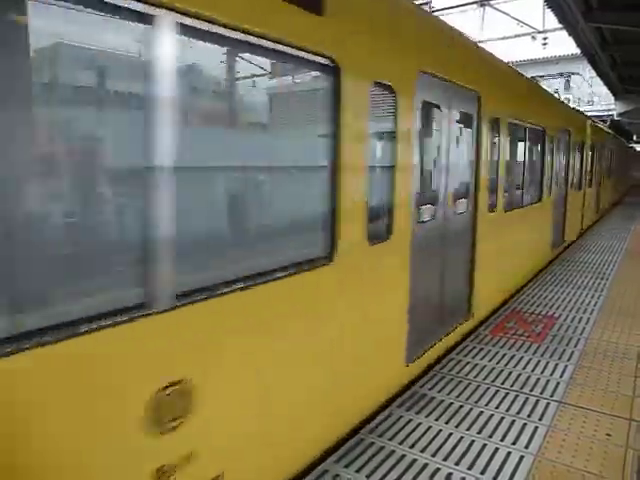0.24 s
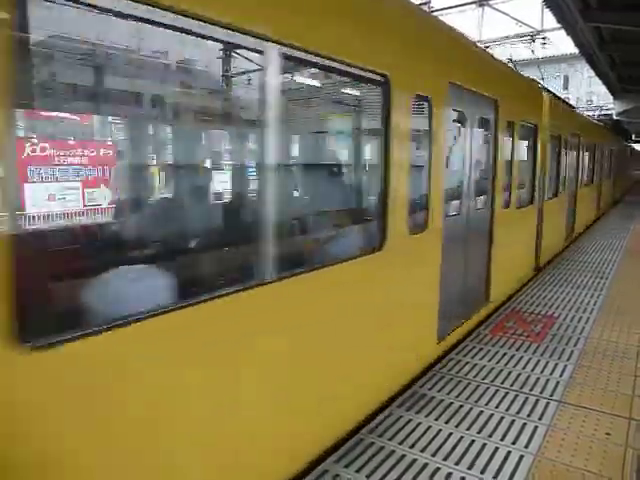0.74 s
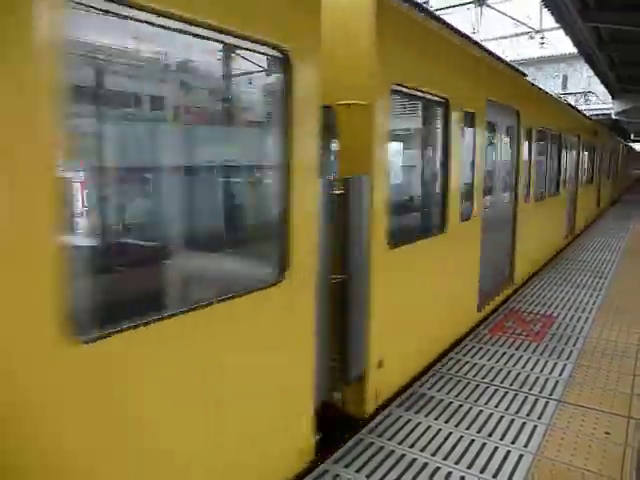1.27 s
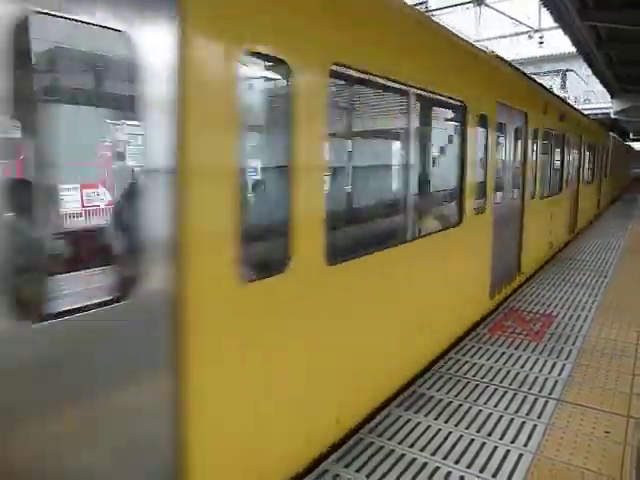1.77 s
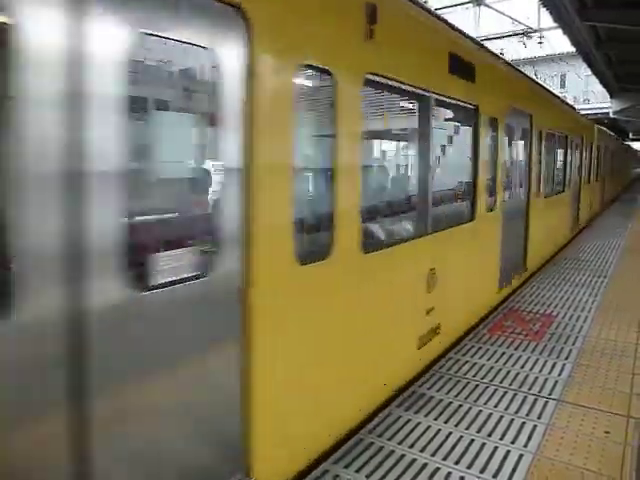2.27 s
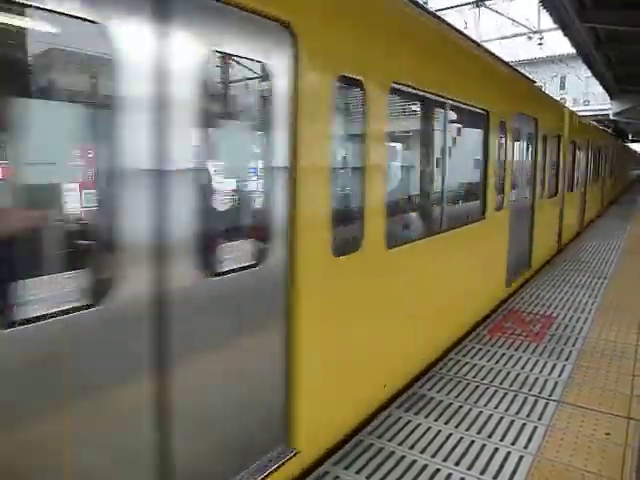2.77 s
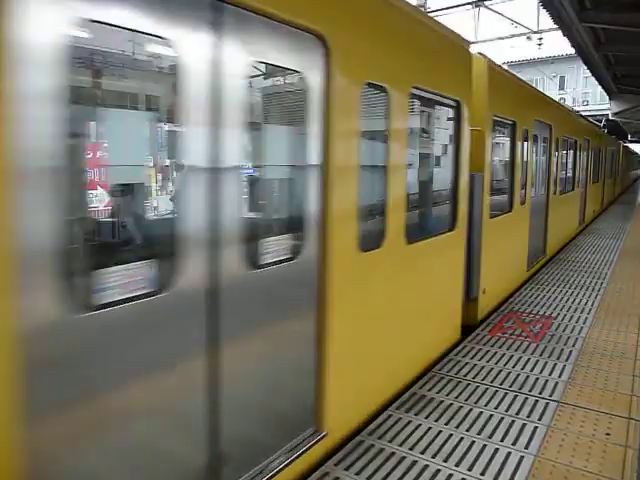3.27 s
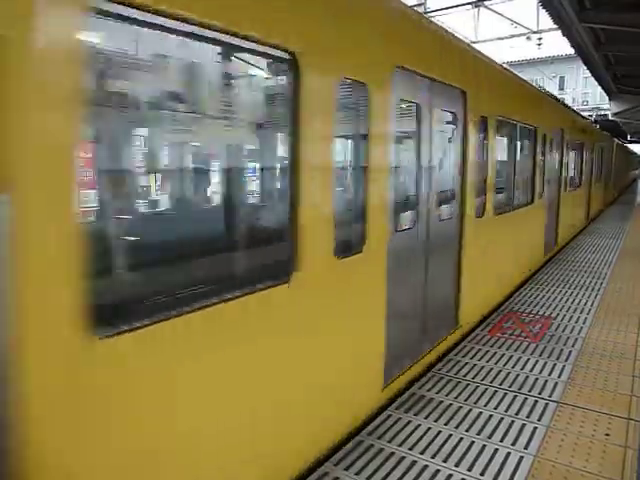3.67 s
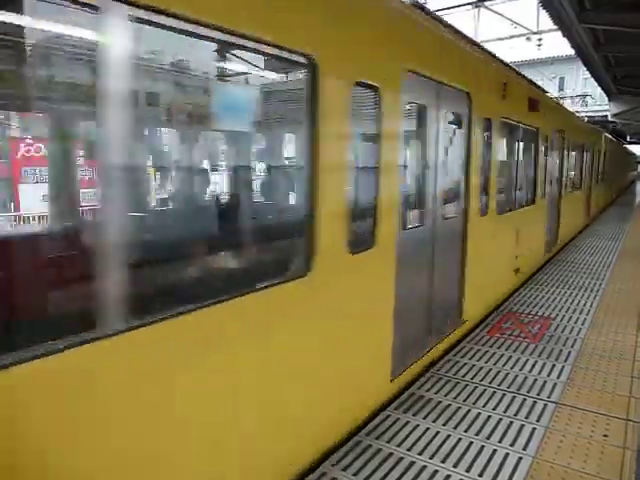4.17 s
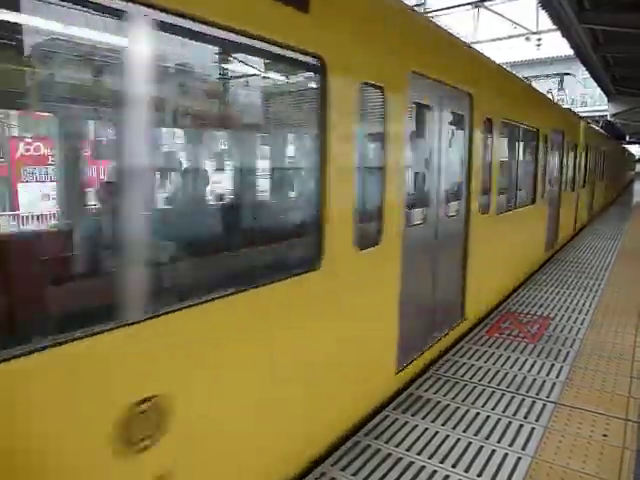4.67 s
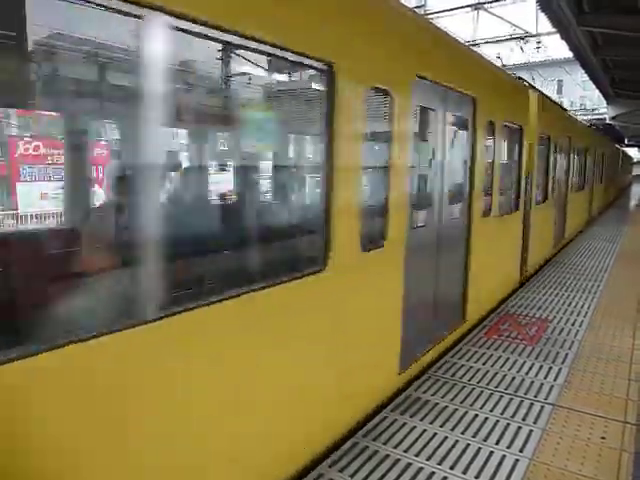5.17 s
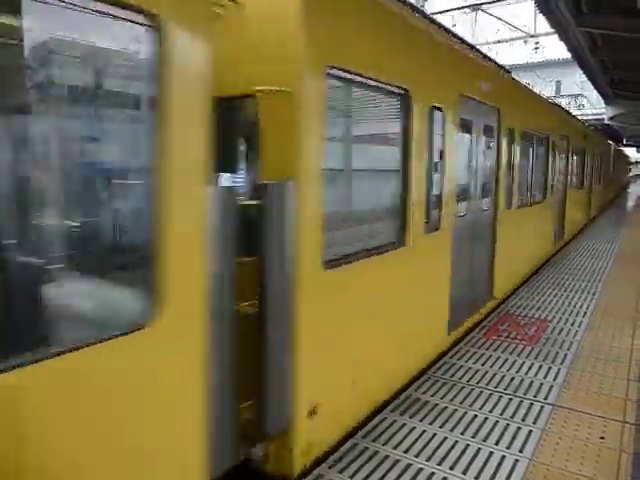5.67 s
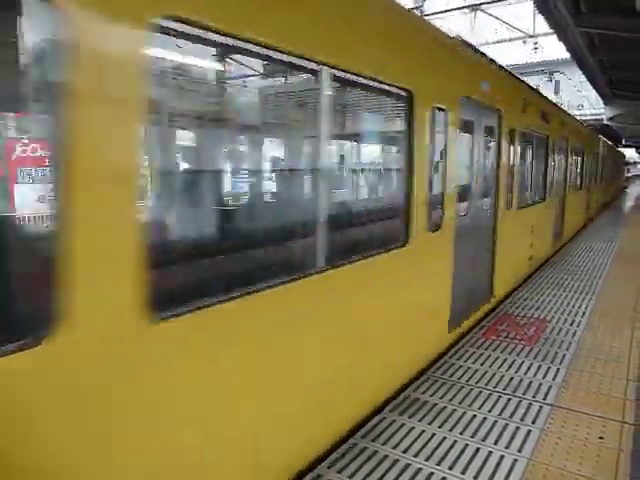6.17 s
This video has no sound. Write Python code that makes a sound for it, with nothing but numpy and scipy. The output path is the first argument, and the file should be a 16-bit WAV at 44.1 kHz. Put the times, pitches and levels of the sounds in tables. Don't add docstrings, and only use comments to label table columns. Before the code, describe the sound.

Beside a roofed station platform, an electric train is already rolling past and slowly gathering speed. A wavering motor hum and thinner whine creep upward over steady wheel roar and hiss. Axles clack in pairs, some near and bright, others duller and farther. Bogies rumble, panels boom, and a faint squeal comes late before the motors ease off. A small stereo camera hears it close, with slightly dull treble.

```python
import sys
import numpy as np
from scipy import signal
from scipy.fft import rfft, irfft, next_fast_len
from scipy.io import wavfile
from scipy.ndimage import uniform_filter1d

SR = 44100
rng = np.random.default_rng(int(sys.argv[2]) if len(sys.argv) > 2 else 0)


def master_out(mix):
    frames = np.transpose(np.atleast_2d(mix))
    ceiling = np.clip(frames, -1, 1)
    pcm = np.round(ceiling * 32767).astype(np.int16)
    wavfile.write(sys.argv[1], SR, pcm)


def invert_db(x):
    u = np.asarray(x, float) / 20
    return 10 ** u


N = 284004

# (t/s, level/dB)
ROLL = [(0, 2.5), (.7, 1.5), (1.1, -1.5), (2.0, 0), (2.7, -0.5), (3.4, 4.5), (4.3, 3.5), (5.1, 1.5),
        (5.36, 3.5), (5.6, 2.5), (6.06, 4), (6.44, 2.5)]
# (lower f/Hz, higher f/Hz)
RAIL_HZ = (2357, 3010)


def evened(x):
    return x / np.sqrt(np.mean(x ** 2) + 1e-20)


def read(points, hz):
    f, value = np.transpose(points)
    return np.interp(np.log(hz + 1), np.log(f + 1), value)


def curves(rows):
    s, *columns = np.transpose(rows)
    return [np.interp(np.arange(N) / SR, s, c) for c in columns]


def passing(rows, far_db):
    t = np.arange(0, N + 32, 32) / SR
    power = invert_db(2 * far_db)
    for s, db, half_s in rows:
        power = power + invert_db(2 * db) * np.exp(-((t - s) / half_s) ** 2)
    return np.interp(np.arange(N) / SR, t, 10 * np.log10(power))


def drift(rate_hz):
    size = next_fast_len(N // 16 + 2)
    a, b = rng.standard_normal((size // 8, 2)).T
    hz = np.arange(len(a)) * SR / (16 * size)
    spectrum = (a + 1j * b) * np.exp(-(2 * hz / rate_hz) ** 4)
    coarse = evened(irfft(spectrum, size))
    return np.interp(np.arange(N) / 16, np.arange(size), coarse)


def port_pair(left, other, hz):
    # (f/Hz, likeness 0..1)
    likeness = [(60, .85), (120, .945), (230, .996), (460, .996), (910, .96), (1810, .76), (3570, .61),
                (7060, .6), (8200, .97)]
    # (f/Hz, phase/rad)
    lead = [(60, .01), (300, .07), (900, .25), (2000, .55), (4000, .35), (7200, .1)]
    # (f/Hz, level/dB)
    tilt = [(60, .6), (1400, .6), (2500, .2), (4200, -.5), (7000, -.5)]
    same = np.clip(read(likeness, hz), 0, 1)
    right = same * left + np.sqrt(1 - same ** 2) * other
    right = right * np.exp(-1j * read(lead, hz))
    half_tilt_db = read(tilt, hz) / 2
    return np.array([left * invert_db(half_tilt_db), right * invert_db(-half_tilt_db)])


def noise(spectrum, patchy_db, size=1024, apart=False):
    frames = 4 * N // size + 5
    hz = np.fft.rfftfreq(size, 1 / SR)[:, None]
    a, b, c, d, patches = rng.standard_normal((frames, size // 2 + 1, 5)).T
    patches = uniform_filter1d(patches, size=size // 128, axis=0)
    patches = evened(uniform_filter1d(patches, size=12000 // size, axis=1))
    z = np.array([a + 1j * b, c + 1j * d])
    if not apart:
        z = port_pair(*z, hz)
    z = z * invert_db(read(spectrum, hz) + patchy_db * patches)
    return evened(signal.istft(z, nperseg=size, noverlap=3 * size // 4)[1][:, :N])


def tone(hz, level_db, waver_hz, fuzz, width_hz):
    turns = np.exp(2j * np.pi * np.cumsum(hz + waver_hz * drift(9.0)) / SR)
    paths = [drift(width_hz) + 1j * drift(width_hz) for _ in range(2)]
    left = np.sqrt(1 - fuzz) + np.sqrt(fuzz / 2) * paths[0]
    other = paths[1] / np.sqrt(2)
    return np.sqrt(2) * invert_db(level_db) * (port_pair(left, other, np.mean(hz)) * turns).real


def air():
    # (f/Hz, level/dB per Hz)
    draught = [(20, -31.5), (45, -8), (100, -3), (200, -13.5), (400, -18.5), (1000, -48.5)]
    gust_db = 0.5 * drift(3.0)
    return noise(draught, patchy_db=2.0, size=2048, apart=True) * invert_db(-54.5 + gust_db)


def steady_hum():
    # (f/Hz, level/dB)
    hum_hz, hum_db = (74, -45.5)
    return tone(hum_hz, hum_db, waver_hz=1.8, fuzz=.7, width_hz=14)


def rumble():
    # (f/Hz, level/dB per Hz)
    ground = [(25, -27.5), (50, -10), (90, -5.5), (120, -3), (200, 3.5), (260, -8.5), (400, -37)]
    # (nearest t/s, peak level/dB, half length/s)
    bogies = [
        (0, -28.5, 0.24),
        (.62, -28.5, 0.14),
        (1.34, -29.5, 0.23),
        (2.6, -31, 0.55),
        (3.4, -28.5, 0.077),
        (4.3, -33.5, .4),
        (5.3, -31.5, 0.36),
        (6.4, -27.5, 0.45),
    ]
    return noise(ground, patchy_db=2.4, size=2048) * invert_db(passing(bogies, -36) + 0.5)


def panels():
    # (nearest t/s, peak level/dB, half length/s)
    low = [
        (2.0, -33, 0.13),
        (3.6, -29, 0.038),
        (5.17, -26, .05),
        (5.4, -32.5, 0.066),
        (5.92, -23, 0.04),
        (6.09, -20, 0.03),
        (6.35, -30, 0.059),
    ]
    # (nearest t/s, peak level/dB, half length/s)
    high = [
        (1.35, -27.5, 0.15),
        (1.72, -21, 0.024),
        (2.2, -31.5, 0.11),
        (3.0, -27, 0.022),
        (4.469, -34, 0.04),
        (6.35, -30.5, 0.066),
    ]
    booms = 0
    for hz, rows in ((349.4, low), (478.4, high)):
        booms = booms + tone(hz, passing(rows, -42), waver_hz=6, fuzz=.85, width_hz=70)
    return booms


def squeals():
    # (t/s, level/dB, half length/s)
    rail_squeals = [
        (4.2, -48.5, .25),
        (6.3, -46, 0.092),
    ]
    # (nearest t/s, peak level/dB, half length/s)
    flange_pass = [
        (1.9, -66, 0.16),
    ]
    rail = tone(RAIL_HZ[1], passing(rail_squeals, -53.5), waver_hz=10, fuzz=1, width_hz=160)
    flange = tone(7400., passing(flange_pass, -87.5), waver_hz=15, fuzz=.8, width_hz=120)
    return rail + flange


def rolling():
    # (f/Hz, level/dB per Hz)
    body = [(150, -32.5), (260, 2), (400, 0), (520, -4.5), (650, -10.5), (820, -11.5), (1000, -13),
            (1350, -21), (2000, -31), (4000, -42.5)]
    # (f/Hz, level/dB per Hz)
    hiss = [(700, -27), (1300, -5), (1800, 1), (2350, 1.5), (2750, -4.5), (3500, -6), (4500, -8.5),
            (6000, -22)]
    load_db, = curves(ROLL)
    flicker = drift(10.0)
    body_db = -26 + 0.59 * load_db + 1.5 + 1.6 * flicker
    hiss_db = -40 + 0.91 * load_db + 0.63 * flicker
    roar = noise(body, patchy_db=1.6) * invert_db(body_db)
    return roar + noise(hiss, patchy_db=0.9, size=512) * invert_db(hiss_db)


def motors():
    # (t/s, f/Hz)
    speed = [
        (0, 280.4),
        (.8, 286.8),
        (1.6, 289.3),
        (2.4, 292.3),
        (3.1, 296.4),
        (3.8, 302),
        (4.5, 303.3),
        (5.2, 307.2),
        (6.44, 309.8),
    ]
    # (middle t/s, peak level/dB, half length/s)
    hum_swells = [(0.056, -21.5, 0.061), (0.327, -16, 0.019), (0.412, -15, 0.02), (0.603, -15.5, 0.02),
                  (0.683, -15, 0.023), (0.772, -19.5, 0.026), (0.884, -16.0, 0.012), (1.062, -15.5, 0.15),
                  (1.391, -16.5, 0.022), (1.514, -16.5, 0.03), (1.668, -17, 0.016), (1.795, -14.0, 0.035),
                  (1.888, -18, 0.018), (2.022, -20.9, 0.056), (2.23, -13.8, 0.041), (2.325, -17.5, 0.073),
                  (2.592, -22, 0.047), (2.779, -18.5, 0.012), (2.908, -17.5, 0.034), (3.039, -16, 0.031),
                  (3.262, -18.5, 0.025), (3.453, -18, 0.03), (3.763, -18, 0.023), (3.881, -21.5, 0.037),
                  (3.99, -17, 0.029), (4.289, -18, 0.022), (4.395, -16.9, 0.051), (4.519, -17.0, 0.021),
                  (4.8, -21, 0.09), (5.024, -19, 0.072)]
    # (nearest t/s, peak level/dB, half length/s)
    slot_passes = [
        (.1, -31.5, 0.18),
        (.7, -30.5, 0.35),
        (1.7, -37.5, 0.68),
        (2.95, -36, 0.23),
        (3.6, -40, 0.26),
        (4.2, -38, 0.23),
        (5.05, -41, 0.22),
    ]
    octave_passes = [
        (.85, -29.5, 0.1),
        (1.85, -26, 0.36),
        (2.78, -26.5, 0.18),
        (3.38, -27.5, .08),
        (3.93, -30.5, 0.21),
        (4.55, -28, .12),
    ]
    fan_passes = [
        (.15, -31, 0.18),
        (.8, -29, .2),
        (1.6, -34, .3),
        (3.65, -29.5, 0.13),
        (4.35, -31, 0.42),
        (4.85, -29.5, 0.21),
        (5.55, -31, 0.1),
    ]
    mesh_hz, = curves(speed)
    power_off_s, fade_s, coast_db = 5.17, .06, -4.5
    coasting = np.clip((np.arange(N) / SR - power_off_s) / fade_s, 0, 1)
    hum_db = passing(hum_swells, -27) + coast_db * coasting
    octave_db = passing(octave_passes, -43) - 5
    fan_db = passing(fan_passes, -44.5) - 4
    slot_db = passing(slot_passes, -50.5)
    hum = tone(mesh_hz, hum_db, waver_hz=4, fuzz=.06, width_hz=50)
    octave = tone(2 * mesh_hz, octave_db, waver_hz=3, fuzz=.75, width_hz=45)
    fan = tone(2.62 * mesh_hz, fan_db, waver_hz=5, fuzz=.95, width_hz=70)
    slots = tone(5.24 * mesh_hz, slot_db, waver_hz=4, fuzz=.75, width_hz=105)
    return hum + octave + fan + slots


def blow(t, length, rise, tail):
    swell = np.sin(np.pi / 2 * np.minimum(t / rise, 1)) ** 2
    return swell * np.exp(-np.maximum(t - length, 0) / tail) * np.exp(-t / (3 * length))


def modes(table, chance, t, rise, spread, pitch=1):
    rings = 0
    for (hz, db, t60), (turn, shift) in zip(table, chance):
        tuned_hz = pitch * hz * (1 + spread * (shift - .5))
        rings = rings + invert_db(db - 60 * t / t60) * np.sin(2 * np.pi * (tuned_hz * t + turn))
    return np.minimum(t / rise, 1) * rings


def axle_blows():
    # (t/s, clang level/dB, thud level/dB, knock level/dB, thud f/Hz)
    near_joint = [(0.1303, -19, -20.5, -14, 215), (0.4, -23.5, -19, -18, 178),
                  (0.8608, -21, -20.5, -16, 141.4), (1.1235, -23.5, -36, -20, 135),
                  (2.420, -24, -24, -17, 150), (2.6632, -20, -19, -14.5, 189),
                  (3.1, -22, -18, -15.5, 156.5), (3.347, -21.5, -32, -14, 178),
                  (4.5899, -20, -19, -14.5, 172.7), (4.81, -21, -22, -13, 180),
                  (5.237, -21, -20, -12.5, 223), (5.472, -21.5, -24, -15, 198)]
    # (t/s, clang level/dB, thud level/dB, knock level/dB)
    far_joint = [(0.238, -26, -22, -32), (0.7486, -30, -33.5, -25), (1.457, -39.5, -15, -23),
                 (1.4756, -44, -24, -42), (1.7017, -31.5, -13.5, -25), (2.444, -44.5, -14.5, -26),
                 (2.998, -35, -27, -23), (3.6711, -28, -14.5, -24), (3.907, -38, -19, -18),
                 (4.5555, -30, -26, -18.5), (5.134, -28, -18.5, -18), (5.790, -25, -18.5, -20.5),
                 (5.881, -32, -41, -21.5), (6.025, -33, -20.5, -18.5), (6.202, -42, -36, -25),
                 (6.262, -36, -35, -26)]
    # (f/Hz, level/dB, t60/s)
    wheel = [(1020, -5, .08), (1424, 3.5, .07), (1690, -13.5, .09), (2200, -10, .09), (2420, -10, .1),
             (3520, -2.5, .08)]
    # (multiple of thud pitch, level/dB, t60/s)
    bed = [(.4, -11.5, .2), (.62, -7.5, .16), (1, 0.5, 0.13), (1.5, -1.5, 0.092), (2.3, -8, 0.096)]
    near_cross_s, far_cross_s, far_thud_hz = .055, .043, 215
    knock, clang, fizz, struck = np.zeros((4, N + SR))
    t = np.arange(SR // 4) / SR
    blows = [row + (near_cross_s,) for row in near_joint]
    blows += [row + (far_thud_hz, far_cross_s) for row in far_joint]
    chances = rng.random((len(blows), len(wheel) + len(bed), 2))
    for (s, clang_db, thud_db, knock_db, thud_hz, length), chance in zip(blows, chances):
        start = round(s * SR)
        at = slice(start, start + len(t))
        plateau = blow(t, 0.97 * length, rise=0.0075, tail=0.042)
        first_hit = 0.5 * blow(t, 0.011, rise=0.011, tail=0.023)
        knock[at] += invert_db(knock_db - 8) * (plateau + first_hit)
        clang[at] += invert_db(clang_db - 10.5) * blow(t, length, rise=.02, tail=0.067)
        fizz[at] += invert_db(clang_db - 19.5) * blow(t, 1.7 * length, rise=.032, tail=0.035)
        struck[at] += invert_db(clang_db - 10.5) * modes(wheel, chance, t, rise=0.0097, spread=0.027)
        bed_chance = chance[len(wheel):] * [.25, 1]
        thud = modes(bed, bed_chance, t, rise=0.0087, spread=0.12, pitch=thud_hz)
        struck[at] += invert_db(thud_db + 4.0) * thud
    return knock[:N], clang[:N], fizz[:N], struck[:N]


def joints():
    # (f/Hz, level/dB per Hz)
    knock_spectrum = [(200, -16), (400, 1.5), (600, -7), (850, -1.5), (1150, -9), (1500, -22), (2500, -38)]
    clang_spectrum = [(900, -15.5), (1500, -3), (2000, 0.5), (2400, -6.5), (2800, -6.5), (3400, -8.5),
                      (4500, -11.5), (6000, -21.5)]
    fizz_spectrum = [(2500, -26), (4000, -0.5), (5000, 2.5), (6000, 0.5), (7000, -5), (9000, -9.5)]
    # (nearest t/s, peak level/dB, half length/s)
    fizz_passes = [
        (.15, -41, 0.26),
        (.65, -52, .15),
        (1.35, -49, 0.11),
        (2.2, -44, 0.3),
        (3.3, -45.5, .7),
        (4.3, -49, .4),
        (5.5, -44, 0.55),
        (6.25, -45.5, 0.23),
    ]
    knock, clang, fizz, struck = axle_blows()
    rattle = invert_db(0.6 * drift(80.0))
    bursts = noise(knock_spectrum, patchy_db=2.0, size=512) * knock * rattle
    bursts += noise(clang_spectrum, patchy_db=1.0, size=512) * clang * rattle
    load_db, = curves(ROLL)
    singing = np.hypot(invert_db(-51.5 + 1.1 * load_db), invert_db(-5.5) * clang)
    bursts += tone(RAIL_HZ[0], 0, waver_hz=20, fuzz=1, width_hz=300) * singing
    steady_fizz = invert_db(passing(fizz_passes, -53) + .6 * drift(14.0))
    bursts += noise(fizz_spectrum, patchy_db=1.0, size=512) * np.hypot(fizz * rattle, steady_fizz)
    return bursts + np.array([struck, .93 * np.roll(struck, 2)])


def scene():
    background = air() + steady_hum() + rumble() + panels() + squeals()
    return background + rolling() + motors() + joints()


def roll_off(x):
    return signal.sosfilt(signal.butter(12, 8760, fs=SR, output="sos"), x)


def record(dry):
    # (f/Hz, level/dB)
    camera_band = [(22, -9), (40, 0), (7000, 0), (7400, -6), (7750, -19), (7880, -36), (8000, -70), (8150, -34),
                   (8400, -30), (8650, -33), (8800, -80), (20000, -90)]
    size = next_fast_len(N + 4096)
    response = invert_db(read(camera_band, np.fft.rfftfreq(size, 1 / SR)))
    heard = irfft(rfft(dry, size) * response, size)[:, :N]
    return roll_off(heard)


dry = scene()
out = record(dry)
master_out(out)
```